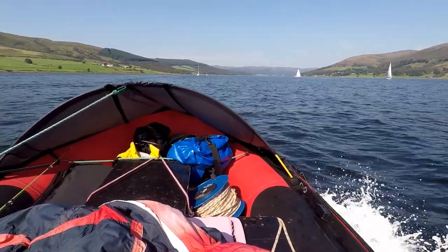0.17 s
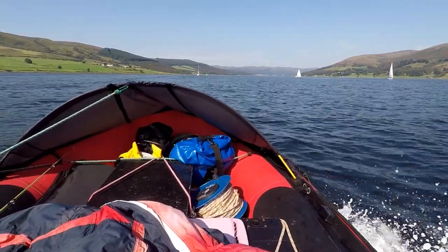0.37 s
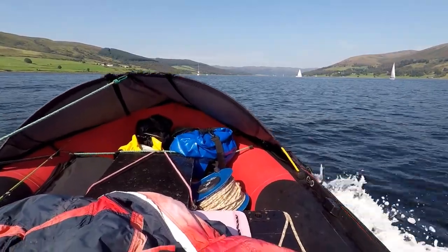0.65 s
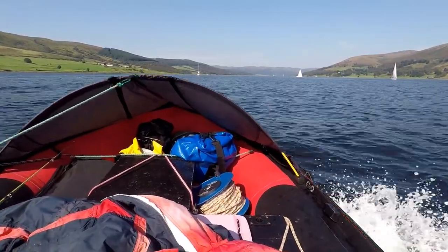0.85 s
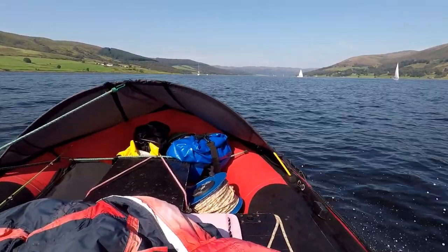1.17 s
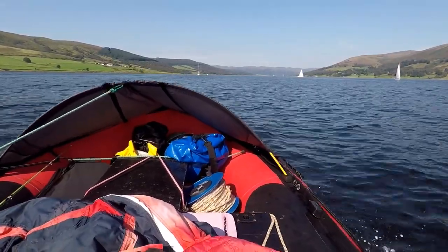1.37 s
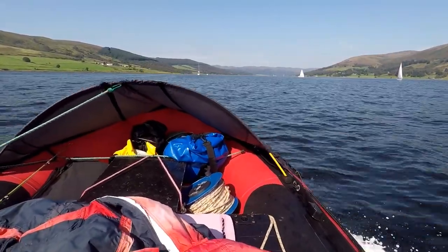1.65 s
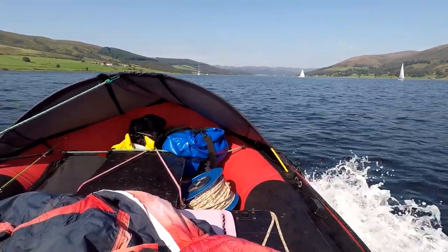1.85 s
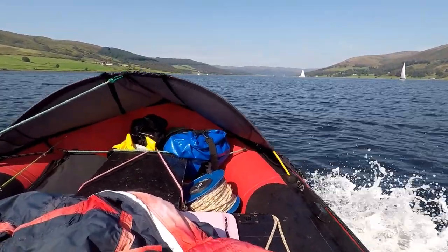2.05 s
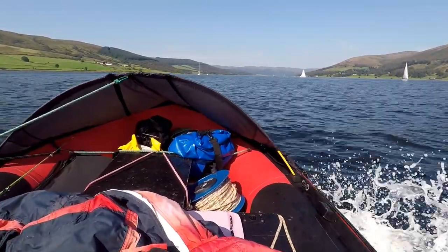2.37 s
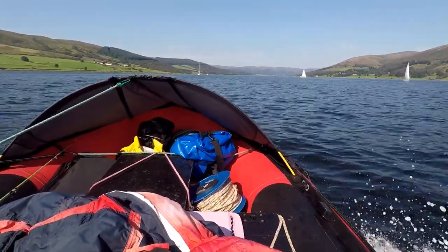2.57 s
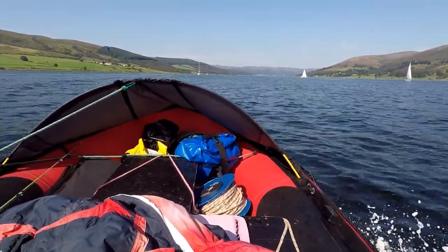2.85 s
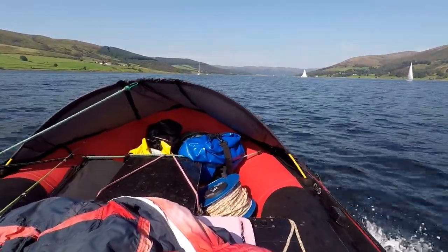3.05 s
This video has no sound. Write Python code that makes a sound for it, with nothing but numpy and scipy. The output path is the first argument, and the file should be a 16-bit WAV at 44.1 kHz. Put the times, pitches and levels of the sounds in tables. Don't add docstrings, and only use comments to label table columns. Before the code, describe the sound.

A small outboard motor drones steadily at speed, heard on board an inflatable boat on open water; wind rumbles on the microphone, spray bursts hiss repeatedly, and soft thuds come from the floor.

```python
import sys
import numpy as np
from scipy import signal
from scipy.fft import rfft, irfft, next_fast_len
from scipy.io import wavfile
from scipy.ndimage import uniform_filter1d, minimum_filter1d, map_coordinates

SR = 44100
rng = np.random.default_rng(int(sys.argv[2]) if len(sys.argv) > 2 else 0)


def gain_from_db(level_db):
    decades = np.asarray(level_db, float) / 20
    return 10 ** decades


def pcm_store(signal):
    levels = np.round(np.clip(np.atleast_2d(signal), -1, 1) * 32767)
    wavfile.write(sys.argv[1], SR, levels.astype(np.int16).T)


N = 141120


def unit(x):
    return x / np.sqrt(np.mean(x ** 2) + 1e-20)


def curve(rows):
    seconds, values = np.transpose(rows)
    return np.interp(np.arange(N) / SR, seconds, values)


def wobble(rate):
    return map_coordinates(rng.standard_normal(400), [np.arange(N) * rate / SR], mode="wrap")


def coloured(x, spectrum):
    size = next_fast_len(N + 8192)
    hz, db = np.transpose(spectrum)
    log_hz = np.log(np.fft.rfftfreq(size, 1 / SR) + 1)
    gain = gain_from_db(np.interp(log_hz, np.log(hz + 1), db, right=-120))
    return unit(irfft(rfft(x, size) * gain, size)[:N])


def patchy(patchy_db):
    bins = signal.stft(rng.standard_normal(N + 512), nperseg=512)[2]
    field = uniform_filter1d(rng.standard_normal(bins.shape), size=6, axis=0)
    field = uniform_filter1d(field, size=8, axis=1)
    return signal.istft(bins * gain_from_db(patchy_db * unit(field)), nperseg=512)[1][:N]


# (frequency [Hz], density [dB per Hz])
BUFFET_COLOUR = [(3, -18), (25, 0.5), (80, 0), (130, -4), (220, -12.5), (300, -17.5), (395, -20),
                 (425, -51)]
# (time [s], strength [dB])
GUSTS = [(0.0, -20.5), (0.07, -20.5), (0.81, -24.5), (0.87, -22.5), (1.18, -25), (1.37, -20), (1.67, -20.5),
         (1.79, -18.5), (1.83, -27.5), (3.2, -12.5)]
BUFFET_DB, GUST_FOLLOW, GUST_DB = -16.5, 0.35, 0.2
SQUEEZE, SQUEEZE_S = .5, .04


def wind():
    rumble = coloured(rng.standard_normal(N), BUFFET_COLOUR)
    span = int(SQUEEZE_S * SR)
    power = uniform_filter1d(uniform_filter1d(rumble ** 2, span), span)
    level = np.sqrt(np.abs(power) + .05)
    strength_db = curve(GUSTS)
    gust_db = GUST_FOLLOW * (strength_db - strength_db.mean()) + GUST_DB * wobble(7)
    return gain_from_db(BUFFET_DB) * unit(gain_from_db(gust_db) * rumble / level ** SQUEEZE)


# (frequency [Hz], width [Hz], level
# [dB rms])
PANELS = [(79.9, 9.6, -26), (178.5, 7.9, -34.5), (231.7, 12, -39), (405, 25, -49), (1284, 30, -57.5)]
# (time [s], level [dB])
THUDS = [
    (.85, -39),
    (1.38, -27),
    (2.66, -19),
    (3.08, -30),
]
THUD_HZ, THUD_S = 266, .035


def panels():
    t = np.arange(N) / SR
    hum = 0
    for hz, width, db in PANELS:
        resonance = [(hz - 3 * width, -60), (hz - width / 2, -3), (hz, 0),
                     (hz + width / 2, -3), (hz + 3 * width, -60)]
        hum = hum + gain_from_db(db) * coloured(rng.standard_normal(N), resonance)
    swell = sum(gain_from_db(db) * np.exp(-((t - s) / THUD_S) ** 2) for s, db in THUDS)
    return hum + swell * np.sin(2 * np.pi * THUD_HZ * t + 0.27 * wobble(33))


# (frequency [Hz], gain [dB])
PORT = [(7500, -1), (9000, -6), (10300, -15), (11300, -21.5), (12300, -15), (13500, -21), (15000, -25),
        (16000, -20.5)]
# (frequency [Hz], density [dB per Hz])
WAKE_COLOUR = [(1000, -29), (1800, -2.5), (2300, 0), (3000, -2), (7000, -1.5), (16000, -0.5)]
WAKE_DB = -44.5


def wake():
    hiss = coloured(coloured(patchy(patchy_db=0.77), WAKE_COLOUR), PORT)
    return gain_from_db(WAKE_DB + 0.33 * wobble(9.2) + 0.66 * wobble(45)) * hiss


DROPS_PER_S, DROP_DB = 1500, -14.5
DROP_HZ, DROP_SPREAD, DROP_CYCLES = 4450, .6, 3.2
DROP_SIZE_DB = 4.5


def drops(count):
    when, pitch, size = rng.uniform(0, 1, (count, 3)).T
    size = np.maximum(size, .03)
    hz = DROP_HZ * np.exp(DROP_SPREAD * 2 * (2 * pitch - 1))
    hz = np.clip(hz, 800, 14000)[:, None]
    k = np.arange(96)
    ring = np.sin(2 * np.pi * hz * k / SR) * np.exp(-k / SR * hz / DROP_CYCLES * 2)
    ring = ring * gain_from_db(-DROP_SIZE_DB * np.log(size))[:, None]
    at = (when * N).astype(int)[:, None] + k
    return unit(np.bincount(at.ravel(), ring.ravel(), N + 96)[:N])


# (frequency [Hz], density [dB per Hz])
SPLASH_COLOUR = [(900, -26), (1400, -4), (2000, -2), (3400, -4.5), (5500, -1.5), (8000, 0.5), (16000, -2.5)]
# (crest time [s], rise [s], hold [s], fall [s], level [dB])
SLAPS = [(0.141, .06, .04, .06, -43), (0.302, .04, 0.023, 0.046, -48.5), (0.497, 0.14, .07, .08, -42),
         (0.708, 0.072, 0.058, 0.041, -41.5), (.91, 0.045, 0.029, 0.089, -40.5),
         (1.085, 0.21, 0.17, 0.054, -37), (1.56, 0.05, .04, 0.082, -45), (1.893, .06, 0.081, 0.15, -50.5),
         (2.234, 0.11, .15, 0.11, -37.5), (2.628, 0.099, 0.082, 0.19, -37.5),
         (2.813, 0.03, .03, .08, -44.5), (3.104, 0.097, 0.05, 0.069, -49)]
SLOPE_DB = 10


def splashes():
    t = np.arange(N) / SR
    power = 0
    for crest, rise, hold, fall, db in SLAPS:
        away = np.maximum((crest - t) / rise, (t - crest - hold) / fall)
        power = power + gain_from_db(db - SLOPE_DB * np.maximum(0, away)) ** 2
    grain = patchy(patchy_db=.7) + gain_from_db(DROP_DB) * drops(count=int(DROPS_PER_S * N / SR))
    flutter_db = .6 * wobble(60) + 1.1 * wobble(150)
    return np.sqrt(power) * gain_from_db(flutter_db) * coloured(coloured(grain, SPLASH_COLOUR), PORT)


# (time [s], speed [Hz])
SPEED = [(0, 66.45), (.3, 66.4), (.6, 66.2), (.9, 65.92), (1.1, 66.2), (1.4, 66.72), (1.75, 66.6),
         (2.0, 66.3), (2.35, 66.17), (2.65, 66.35), (3.2, 66.0)]
# (shaft order, level [dB rms], unsteadiness [dB])
HULL_ORDERS = [(1, -23.5, -2.5), (2, -11.5, 0.85), (3, -27.5, 1.5), (4, -35, -1.5), (5, -31.5, 1),
               (6, -35, -2.5)]
# (shaft order, level [dB rms], unsteadiness [dB])
COWL_ORDERS = [(8, -63, 2), (10, -60, 2), (12, -60, 2), (13, -55.5, 2), (14, -60, 2), (15, -64.5, 2),
               (16, -68, 2), (18, -61, 1.5), (20, -59.5, 2), (21, -58.5, 2), (22, -65, 2), (24, -66, 2),
               (26, -61, 1.5), (33, -64, 2)]
# (frequency [Hz], density [dB per Hz])
ROAR_COLOUR = [(380, -30.5), (430, 1), (600, -3.5), (800, -0.5), (1110, -16.5), (1350, -7), (1700, -13.5),
               (3000, -23.5)]
WANDER = .0006
SMEAR = np.pi / 2
ROAR_DB, ROAR_PULSE = -42, 0.26


def engine():
    shaft_hz = curve(SPEED) * (1 + WANDER * wobble(12))
    turn = 2 * np.pi * np.cumsum(shaft_hz) / SR + 3 * np.pi / 8
    hull = 0
    for order, db, sway_db in HULL_ORDERS:
        level = gain_from_db(db + 2.5 + sway_db * wobble(9))
        hull = hull - level * np.cos(round(order) * turn + SMEAR * round(order) ** 2)
    cowl = 0
    for order, db, sway_db in COWL_ORDERS:
        level = gain_from_db(db + 4.0 + 1.1 * sway_db * wobble(14))
        cowl = cowl + level * np.cos(order * turn + rng.uniform(0, 2 * np.pi))
    pulse = 0.25 * np.cos(turn) + 0.76 * np.cos(3 * turn) + 0.65 * np.cos(5 * turn)
    roar = coloured((1 + ROAR_PULSE * pulse) * patchy(patchy_db=1.3), ROAR_COLOUR)
    return hull + cowl + gain_from_db(ROAR_DB) * roar


def scene():
    return (wind() + panels() + wake() + splashes() + engine())[None]


def top_cut(x):
    return signal.sosfilt(signal.butter(12, 15300, fs=SR, output="sos"), x)


CEILING_DB, HOLD_S = -3, 0.025


def record(dry):
    hold = int(HOLD_S * SR)
    need = np.minimum(1, gain_from_db(CEILING_DB) / (np.abs(dry) + 1e-9))
    gain = uniform_filter1d(minimum_filter1d(need, hold, axis=1), hold, axis=1)
    return top_cut(dry * gain)


dry = scene()
out = record(dry)
pcm_store(out)
```